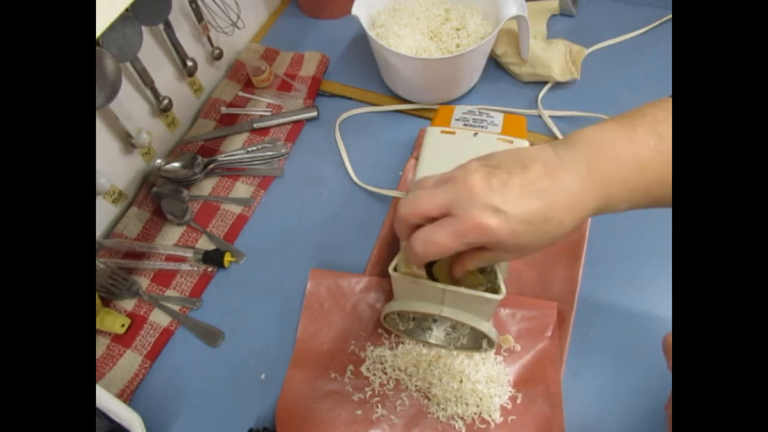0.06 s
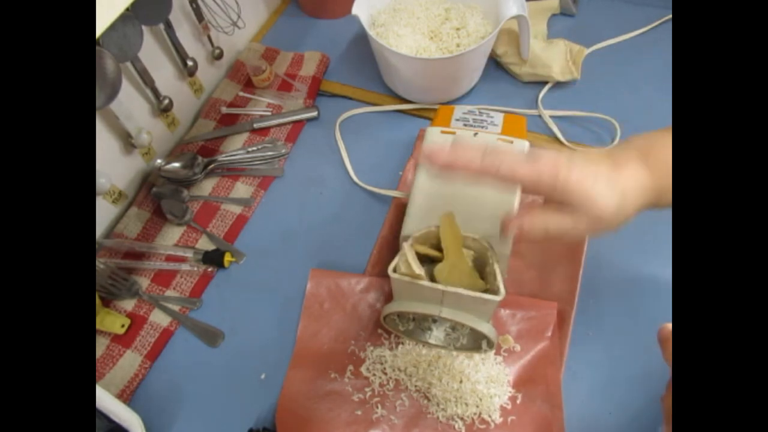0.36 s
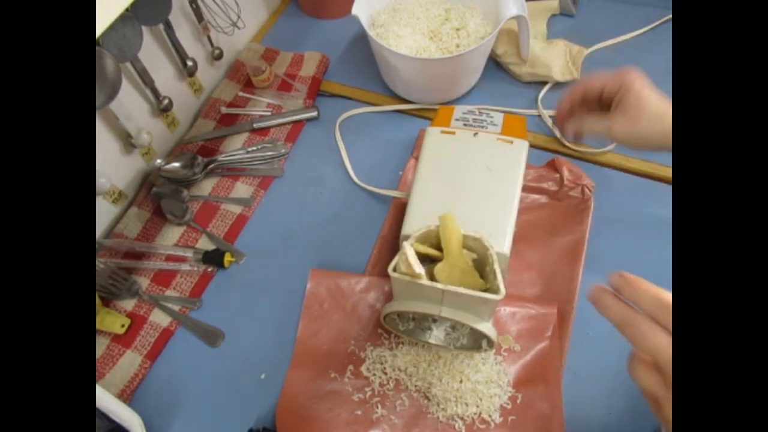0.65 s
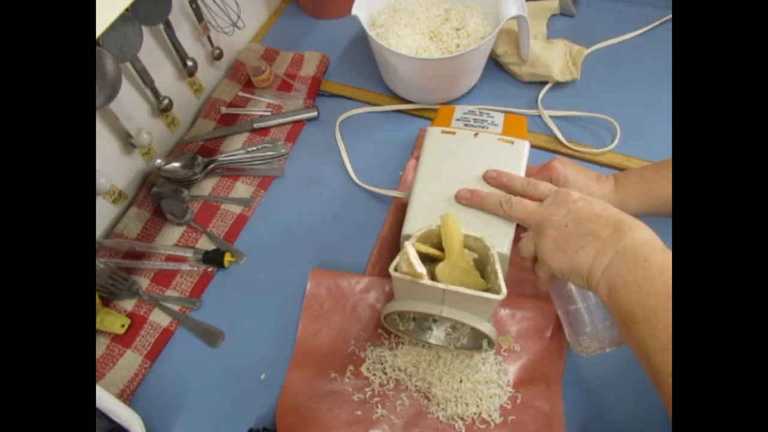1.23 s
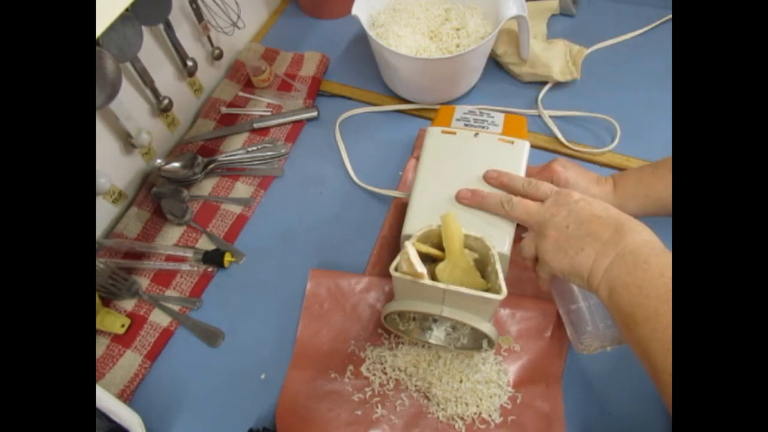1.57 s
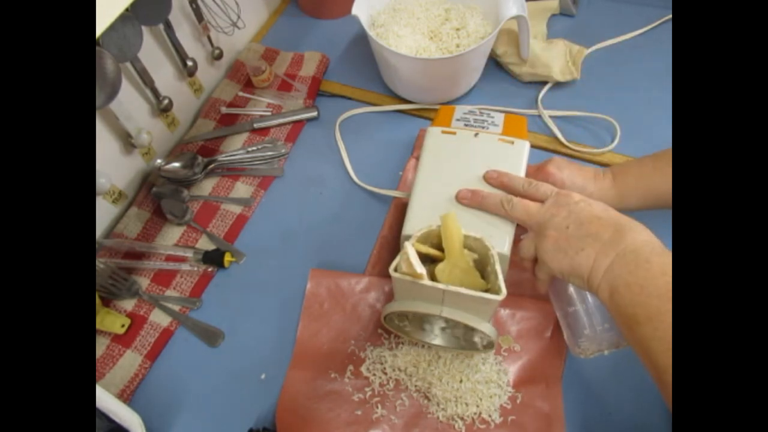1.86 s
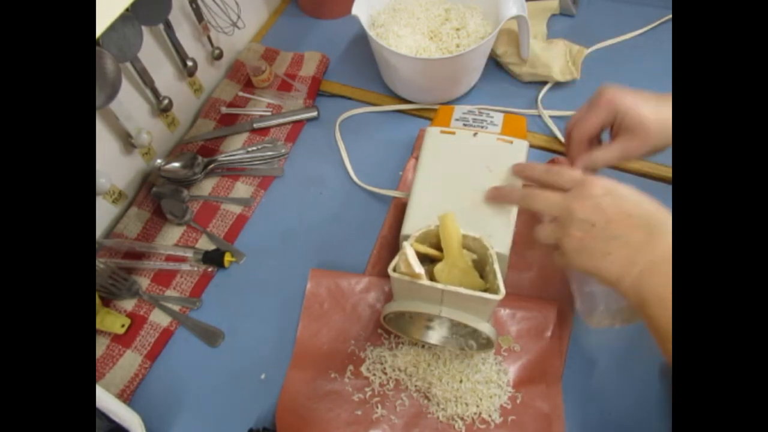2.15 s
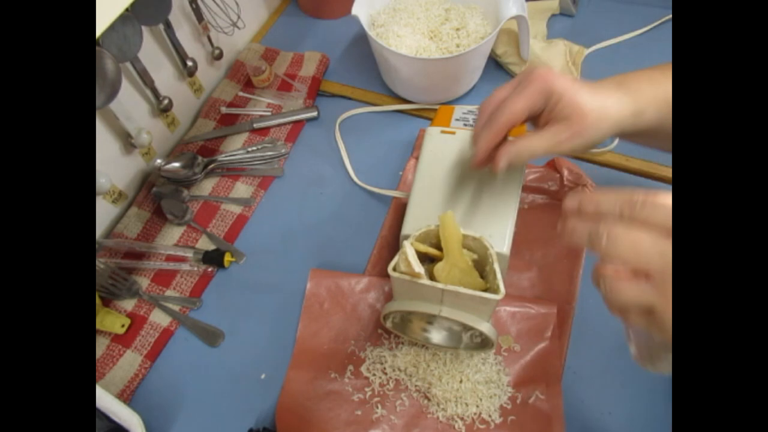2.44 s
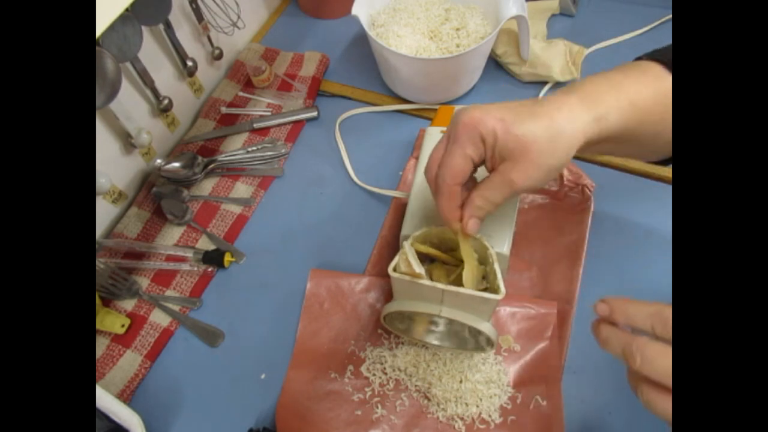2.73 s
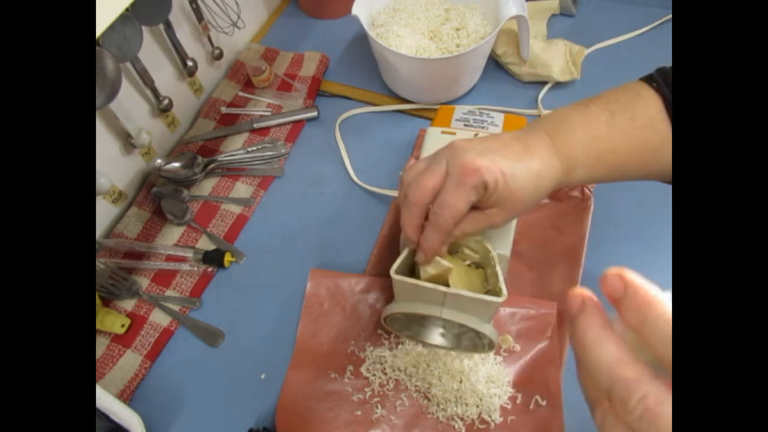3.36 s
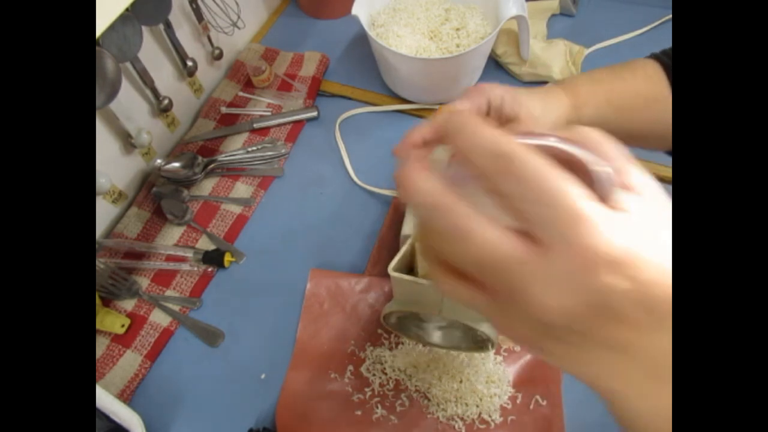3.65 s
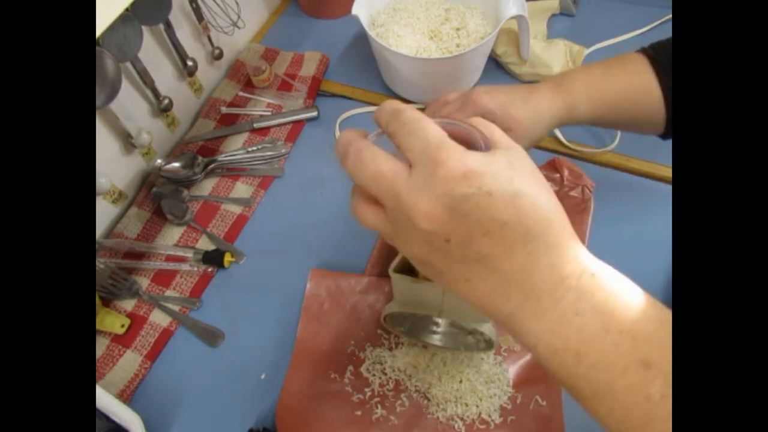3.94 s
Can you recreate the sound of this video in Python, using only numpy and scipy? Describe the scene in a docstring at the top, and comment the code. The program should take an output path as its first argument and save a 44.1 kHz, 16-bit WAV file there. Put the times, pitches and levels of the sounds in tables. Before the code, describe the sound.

An electric grater switches on and spins up to a loud drone after light plastic knocks.

```python
"""Pieces clatter into the plastic hopper of an electric cheese grater; hands brush the mat and grip
the housing. The switch snaps, the motor hums, spins up with a commutator whine and settles into the
loud drone of its unbalanced rotor, with fan tones, gear rattle and brush hiss.
The grater stands on a kitchen table, one microphone just above it."""
import sys
import numpy as np
from scipy import signal
from scipy.fft import rfft, irfft
from scipy.io import wavfile
from scipy.ndimage import map_coordinates

SR = 44100
rng = np.random.default_rng(int(sys.argv[2]) if len(sys.argv) > 2 else 0)


def int16_out(signal):
    """Quantize to a 16-bit WAV file."""
    q = np.round(np.clip(np.atleast_2d(signal).T, -1, 1) * 32767)
    wavfile.write(sys.argv[1], SR, q.astype(np.int16))


N = 176400
TIME = np.arange(N) / SR
EDGE_HZ = 15150  # top of the recorder's band

# resonances and dips of the housing: centre_hz, width_hz, boost_db
HOUSING = [(371, 85, 13.5), (664, 100, 5), (739, 31, -13.5), (962.5, 180, 8), (1062.6, 10.6, 10),
           (1104, 26, -16), (1436, 11.3, 8.5), (1594.5, 24.5, 10.5), (1956, 24, 10), (3913, 320, 2.5)]


def amp(db):
    """Decibels to gain."""
    return 10 ** (np.asarray(db) / 20)


def unit(x):
    """Scales to rms 1."""
    return x / np.sqrt(np.mean(x ** 2) + 1e-20)


def struck(x):
    """Scales a blow to rms 1 over its first 10 ms."""
    return x / np.sqrt(np.mean(x[:SR // 100] ** 2))


def curve(rows, column=1):
    """One column of a timed table, sample by sample."""
    rows = np.array(rows)
    return np.interp(TIME, rows[:, 0], rows[:, column])


def read(points, hz):
    """Reads a table on a log-frequency axis."""
    points_hz, values = np.transpose(points)
    return np.interp(np.log(hz + 1), np.log(points_hz), values)


def add(mix, start_s, sound):
    """Mixes a sound in at a time."""
    part = mix[round(start_s * SR):][:len(sound)]
    part += sound[:len(part)]


def boost(hz, peaks):
    """Decibels that resonances add at a frequency."""
    return sum(db / (1 + (2 * (hz - centre) / width) ** 2) for centre, width, db in peaks)


def colour(x, spectrum, peaks=(), size=8192):
    """Minimum-phase filter from a spectrum and optional resonances."""
    hz = abs(np.fft.fftfreq(size, 1 / SR))
    log_gain = np.log(amp(read(spectrum, hz) + boost(hz, peaks)))
    taps = np.fft.ifft(np.exp(np.conj(signal.hilbert(log_gain)))).real
    return signal.fftconvolve(x, taps[:size // 2])[:len(x)]


def wander(rate_hz):
    """Smooth random motion of rms 1, rolling off above a rate."""
    hz = np.fft.rfftfreq(N, 1 / SR)
    return unit(irfft(rfft(rng.standard_normal(N)) / (1 + (hz / rate_hz) ** 2), N))


def room_tone(level_db=-53):
    """The quiet kitchen: steady, dull noise."""
    # background spectrum: frequency_hz, relative_db
    spectrum = [(25, -8), (600, -10.5), (3000, -19.5), (15000, -28)]
    return amp(level_db) * unit(colour(rng.standard_normal(N), spectrum))


def reverb(x, rise_s=0.0081, size=16384):
    """Short kitchen tail, the treble dying first."""
    # decay of the room: frequency_hz, t60_s
    decay = [(200, 0.21), (1200, 0.18), (10000, 0.083)]
    hz, t, noise = signal.stft(rng.standard_normal(size), SR, nperseg=256)
    tail = signal.istft(noise * amp(-60 * t / read(decay, hz)[:, None]), SR)[1]
    tail *= np.minimum(np.arange(len(tail)) / SR / rise_s, 1)
    return signal.fftconvolve(x, tail / np.linalg.norm(tail))[:N]


def rubbing(strokes, spectrum, grain_db):
    """Tiny slips under strokes that swell and fade."""
    level = sum(amp(db) * np.interp(TIME, [start, start + rise, start + rise + fall], [0, 1, 0])
                for start, rise, fall, db in strokes)
    slips = rng.standard_normal(N) * amp(grain_db * wander(600))
    return level * unit(colour(slips, spectrum))


def mat_rustle():
    """A hand slides over the mat with a light, bright friction."""
    # hand strokes: start_s, rise_s, fall_s, level_db
    strokes = [(.955, 0.029, 0.25, -45), (1.68, 0.02, 0.35, -52)]
    # friction on the mat: frequency_hz, relative_db
    spectrum = [(200, -7.5), (4500, -5), (15000, -18)]
    return rubbing(strokes, spectrum, grain_db=2.0)


def shuffle():
    """Pieces shift in the hopper and a hand grips the housing: a hollow rub."""
    # movements: start_s, rise_s, fall_s, level_db
    strokes = [(-.05, 0.056, 0.3, -48), (1.06, 0.092, 0.15, -52)]
    # friction on the plastic: frequency_hz, relative_db
    spectrum = [(240, 8.5), (380, 23), (550, 4), (1400, 0), (12000, -44)]
    return rubbing(strokes, spectrum, grain_db=3)


def burst(spectrum, t60_s, peaks=(), rise_s=0.0028, size=12000):
    """Dense, quickly dying modes of a struck plastic part."""
    t = np.arange(size) / SR
    envelope = np.minimum(t / rise_s, 1) * amp(-60 * t / t60_s)
    return struck(colour(rng.choice([-1., 1.], size) * envelope, spectrum, peaks))


def thud(detune=0.011, size=12000):
    """The plastic body rings under a dull burst, tuned a little differently at each knock."""
    # body modes: pitch_hz, relative_db, t60_s
    modes = [(256.7, 1, 0.2), (387, 7, .11), (724, 2.5, 0.014)]
    # dull part of a knock: frequency_hz, relative_db
    spectrum = [(120, -35), (230, -0.5), (700, 6), (3500, -60)]
    t = np.arange(size) / SR
    ring = np.zeros(size)
    for hz, db, t60_s in modes:
        pitch_hz = hz * (1 + detune * rng.standard_normal())
        ring += amp(db - 60 * t / t60_s) * np.sin(2 * np.pi * pitch_hz * t)
    return 0.71 * struck(ring) + 0.88 * burst(spectrum, t60_s=0.045, size=size)


def click(hardness_db, top_hz=7200, db_per_octave=4):
    """Contact noise of a knock: the more it stands out over the thud, the brighter it is."""
    # contact noise: frequency_hz, relative_db
    spectrum = [(1200, -7.5), (3100, 4.5), (5000, -6), (7500, -8.5), (15000, -27)]
    cutoff_hz = min(top_hz * 2 ** (hardness_db / db_per_octave), EDGE_HZ)
    lowpass = signal.butter(1, cutoff_hz, fs=SR, output="sos")
    return signal.sosfilt(lowpass, burst(spectrum, t60_s=0.032))


def knocks(gain_db=-4):
    """Each knock on hopper or housing is a thud, a clack and a click."""
    # knocks: start_s, clack_db, thud_db, click_db (all before gain_db)
    blows = [(0.093, -38.5, -38.5, -45), (0.107, -35, -26.5, -35), (0.12, -42, -40, -58),
             (0.168, -46.5, -45, -62), (0.29, -36.5, -30, -35), (0.399, -29.5, -30.5, -42),
             (0.41, -21.5, -20, -24.5), (0.434, -52, -54, -35), (0.453, -41, -36, -38.5),
             (0.646, -68, -66, -45.5), (1.003, -49, -66, -37.5), (1.2, -34, -41, -39),
             (1.225, -25, -34.5, -21.5), (1.27, -38, -46, -37.5), (1.474, -50, -59, -45),
             (1.515, -43, -43.5, -47), (1.767, -38.5, -45, -47), (1.809, -29, -17.5, -27)]
    # midrange clack: frequency_hz, relative_db
    clack = [(450, -33), (900, 1), (1400, 9), (2300, -1), (8000, -97)]
    out = np.zeros(N)
    for start_s, clack_db, thud_db, click_db in blows:
        knock = amp(thud_db) * thud()
        knock += amp(clack_db) * burst(clack, t60_s=0.019, peaks=HOUSING[:6])
        knock += amp(click_db) * click(click_db - thud_db)
        add(out, start_s, knock)
    return amp(gain_db) * out


def switch_on():
    """The switch snaps, then sparks crack at the brushes."""
    # the snap and three sparks: start_s, level_db
    snaps = [(1.842, -12.5), (1.901, -29), (1.927, -25), (1.969, -21.5)]
    # colour of each: frequency_hz, relative_db
    spectrum = [(150, -8), (380, 13), (1300, 6.5), (2100, -1), (6500, 2), (15000, -12.5)]
    out = np.zeros(N)
    for start_s, db in snaps:
        add(out, start_s, amp(db) * burst(spectrum, t60_s=0.033))
    return out


def mains_hum(on_s, fall_db_per_s=77, rest_db=-33):
    """Hum that fades with the starting current."""
    # hum at switch-on: pitch_hz, level_db
    tones = [(120, -26), (360, -24)]
    current = amp(np.clip(-fall_db_per_s * (TIME - on_s), rest_db, 0))
    return current * np.sqrt(2) * sum(amp(db) * np.sin(2 * np.pi * hz * TIME) for hz, db in tones)


def scrape(turns, alike_turns=15, size=120, count=800):
    """Roughness that comes round with each turn and slowly changes: a comb of flickering shaft tones."""
    roughness = rng.standard_normal((count, size))  # one row a turn
    track = signal.lfilter([1], [1, -np.exp(-1 / alike_turns)], roughness, axis=0)
    return unit(map_coordinates(track.ravel(), [turns * size], mode="nearest"))


def gears_and_brushes(turns, gear_scrape_db=-15, brush_scrape_db=-6):
    """Gear rattle pulses once a turn and brush hiss twice, both heard through the housing."""
    # running noise: time_s, rattle_db, hiss_db
    levels = [(1.85, -35, -35.5), (1.96, -18, -28.5), (2.02, -13.5, -26), (2.11, -14, -23.5),
              (2.17, -17.5, -28.5), (2.25, -16, -24.5), (2.6, -17, -25.5), (3.08, -21.5, -28.5),
              (3.35, -19.5, -25.5), (3.63, -24, -30.5), (4, -22, -28.5)]
    # gear rattle: frequency_hz, relative_db
    gear_spectrum = [(60, -35), (160, -26.5), (220, -3), (290, -8.5), (1200, -0.5), (2100, 1.5),
                     (2600, -8.5), (3300, -8), (6000, -40.5)]
    # brush hiss: frequency_hz, relative_db
    brush_spectrum = [(1200, -22.5), (2800, -1), (4700, -5.5), (7000, -8.5), (8500, -13), (11000, -16),
                      (15000, -26.5)]
    teeth = rng.standard_normal(N) + amp(gear_scrape_db) * scrape(turns)
    teeth *= amp(2.8 * np.cos(2 * np.pi * turns) + 0.81 * wander(340))
    sparks = rng.standard_normal(N) + amp(brush_scrape_db) * scrape(turns)
    sparks *= amp(4.2 * np.cos(4 * np.pi * turns) + 0.45 * wander(220))
    rattle = amp(curve(levels)) * unit(colour(teeth, gear_spectrum, HOUSING))
    hiss = amp(curve(levels, column=2)) * unit(colour(sparks, brush_spectrum, HOUSING))
    return rattle + hiss


def partial(cycles, db, flutter, flutter_hz):
    """One fluttering tone locked to the shaft."""
    shake = 1 + flutter * (wander(flutter_hz) + 1j * wander(flutter_hz))
    return amp(db) * unit((shake * np.exp(2j * np.pi * cycles)).real)


def shaft_overtones(speed_hz, turns, settle_s=2.81, settle_width_s=0.026):
    """Overtones of the shaft swell as they sweep across the housing's resonances."""
    # overtones before the housing's boost: shaft_multiple, spin_up_db, full_speed_db
    orders = [(1.998, -41, -38), (3.01, -34.5, -42.5), (4, -35.5, -36), (5.993, -28, -34), (10, -34.5, -48),
              (12, -42, -43), (20, -46, -50.5), (20.64, -41.5, -50.5), (33, -50.5, -62)]
    settled = .5 + .5 * np.tanh((TIME - settle_s) / settle_width_s)
    out = np.zeros(N)
    for multiple, spin_up_db, full_speed_db in orders:
        db = spin_up_db + (full_speed_db - spin_up_db) * settled
        db += boost(multiple * speed_hz, HOUSING) + 2 * wander(3.5)
        out += partial(multiple * turns, db, flutter=0.36, flutter_hz=25.3)
    return out


def cooling_fan(turns, blades=7):
    """The passing blades make a tone and its octave."""
    # blade tone: time_s, tone_db, octave_db
    levels = [(2.05, -24, -43), (2.55, -27, -32.5), (2.8, -26.5, -42), (2.9, -23, -56), (3.0, -35, -50),
              (3.36, -21, -50), (3.48, -25.5, -37.5), (4, -29, -35.5)]
    return sum(partial(k * blades * turns, curve(levels, column=k), flutter=0.11, flutter_hz=12)
               for k in (1, 2))


def commutator(turns, segments=11, wobble_depth=0.51, wobble_hz=25.1):
    """Segments whine past the brushes; running slightly out of true adds sidebands."""
    # whine: time_s, tone_db, octave_db
    levels = [(1.88, -49, -37), (1.97, -41, -26), (2.08, -17.5, -29), (2.18, -29, -37.5), (2.75, -29, -40),
              (2.9, -40, -53), (4, -41, -51)]
    whine = sum(partial(k * segments * turns, curve(levels, column=k), flutter=0.71, flutter_hz=k * 40)
                for k in (1, 2))
    wobble = sum(wander(wobble_hz) * np.cos(2 * np.pi * k * turns) for k in (1, 2))
    return whine * (1 + wobble_depth * wobble)


def rotor_drone(turns):
    """The unbalanced rotor shakes the grater once a turn."""
    # drone: time_s, level_db
    levels = [(1.88, -46), (2.05, -29.5), (2.13, -15.5), (2.23, -20), (2.38, -16.5), (2.65, -20.5),
              (2.89, -11.5), (3.1, -12), (3.17, -17.5), (3.24, -16), (3.34, -11), (3.6, -10.5), (3.72, -14),
              (3.78, -13), (3.93, -11.5)]
    return np.sqrt(2) * amp(curve(levels)) * np.sin(2 * np.pi * turns)


def motor(on_s=1.845, swell_start_s=1.715, swell_rise_s=0.46):
    """The motor hums and spins up; its tones, rattle and hiss all follow the one shaft."""
    # shaft speed: time_s, turns_per_s
    spin_up = [(1.85, 20.0), (1.9, 118.0), (1.95, 169.1), (2.0, 203.5), (2.05, 228.0), (2.1, 248.6),
               (2.17, 269.4), (2.25, 287.2), (2.35, 304.6), (2.5, 319.7), (2.7, 328.7), (2.9, 342.7),
               (3.08, 349.8), (3.25, 348.5), (3.45, 353.8), (3.68, 357.0), (3.85, 355.3), (4.0, 357.5)]
    speed_hz = curve(spin_up)
    on = np.clip((TIME - on_s) / 0.02, 0, 1)
    turns = np.cumsum(speed_hz * on) / SR
    swell = np.clip((TIME - swell_start_s) / swell_rise_s, 0, 1)
    tones = swell * (shaft_overtones(speed_hz, turns) + cooling_fan(turns)) + commutator(turns)
    return on * (rotor_drone(turns) + tones + mains_hum(on_s) + gears_and_brushes(turns))


def scene(body_low_hz=204, reverb_db=-8.5):
    """Handling with its kitchen tail, room tone and motor, alike in both channels."""
    low_cut = signal.butter(2, body_low_hz, "high", fs=SR, output="sos")
    handling = signal.sosfilt(low_cut, knocks() + switch_on()) + mat_rustle() + shuffle()
    mono = room_tone() + handling + amp(reverb_db) * reverb(handling) + motor()
    return np.array([mono, mono])


def record(dry, ceiling=0.9):
    """The recorder rounds off the highest peaks and limits the band."""
    held = dry / (1 + (dry / ceiling) ** 8) ** (1 / 8)
    lowpass = signal.firwin(511, EDGE_HZ, window=("kaiser", 9), fs=SR)
    return signal.oaconvolve(held, lowpass[None], "same")


dry = scene()
out = record(dry)
int16_out(out)
```